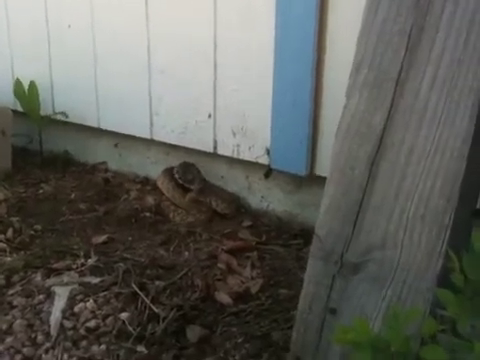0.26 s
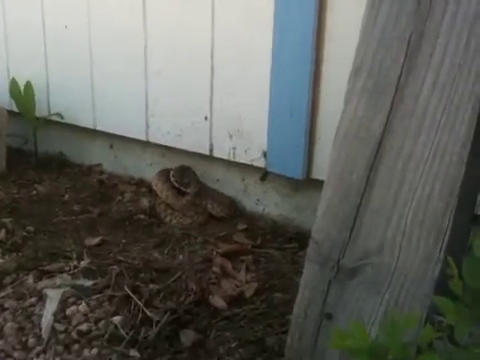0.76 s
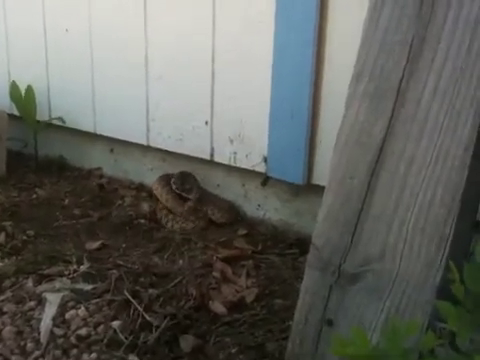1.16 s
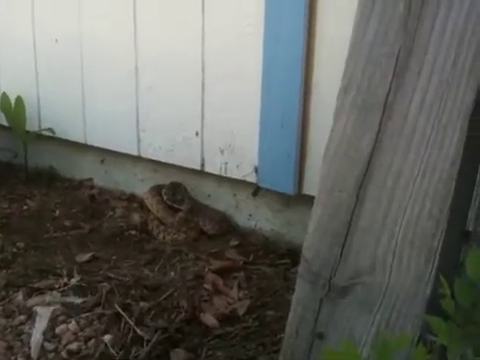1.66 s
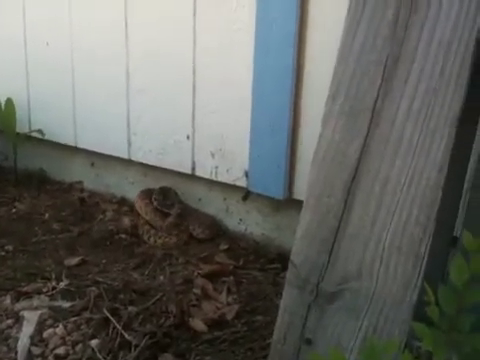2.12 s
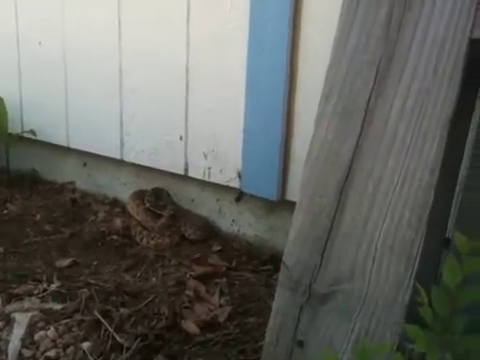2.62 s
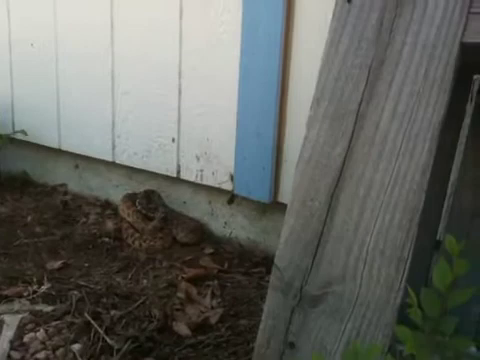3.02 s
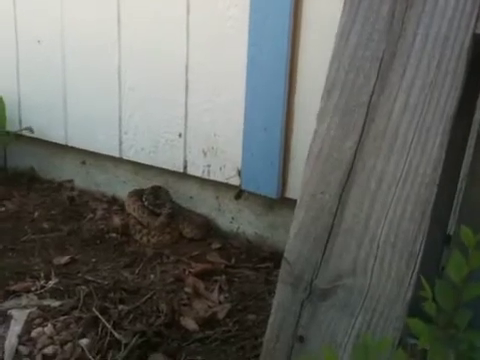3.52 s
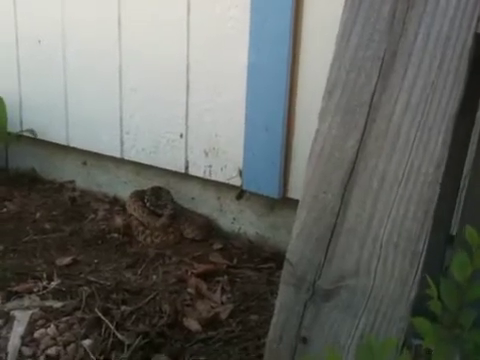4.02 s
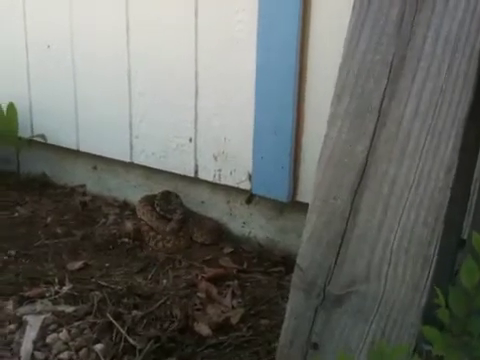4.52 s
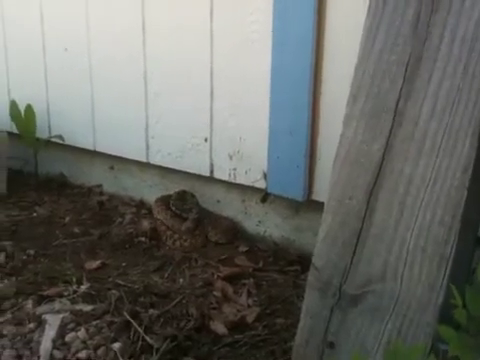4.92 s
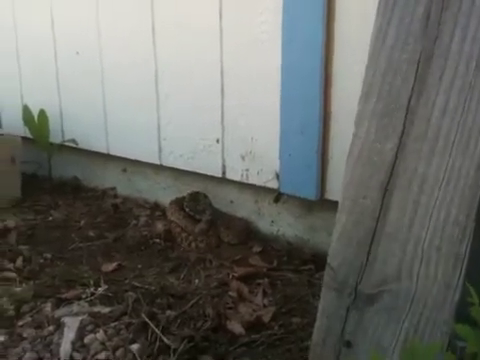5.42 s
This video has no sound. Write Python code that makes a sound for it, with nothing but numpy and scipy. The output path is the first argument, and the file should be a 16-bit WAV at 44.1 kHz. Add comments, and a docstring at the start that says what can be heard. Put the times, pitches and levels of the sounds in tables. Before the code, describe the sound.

Outdoors beside a board wall, a coiled snake finishes a thin, faint in-breath, pauses, then blows one long, airy hiss with a rough, fast flutter that grows to the end. A distant engine hums low and gradually rises in pitch. Mulch crunches softly, crisp ticks snap at about three seconds, and a thick cluster of crunches and hollow knocks comes just after four. Close dry echoes, centred sound, thin bass.

```python
"""A large snake coiled by a garage wall ends a thin in-breath: noise through sharp mouth resonances.
From the start a far eight-cylinder engine, a stack of tones with a rumble, gains speed over traffic, air and whine.
Mulch crunches as grainy noise bursts; after the breath pauses, dull knocks ring hollow and crisp ticks snap.
Then a long hiss swells: a windpipe flap makes the jet flutter, and the mouth slowly widens.
The thickest cluster of crunches and knocks comes past four seconds, under the hiss."""
import sys
import numpy as np
from scipy import signal
from scipy.fft import rfft, irfft, next_fast_len
from scipy.io import wavfile
from scipy.ndimage import uniform_filter1d

SR = 44100
rng = np.random.default_rng(int(sys.argv[2]) if len(sys.argv) > 2 else 0)


def log_audio(samples):
    """Write samples as a 16-bit WAV file to the path given in sys.argv[1]."""
    # one column per channel
    frames = np.atleast_2d(samples).T
    # limit to full scale, then quantise
    limited = np.clip(frames, -1, 1)
    pcm = np.round(limited * 32767).astype(np.int16)
    wavfile.write(sys.argv[1], SR, pcm)


N = 249606
T = np.arange(N) / SR
SIZE = next_fast_len(N)
HZ = np.arange(SIZE // 2 + 1) * SR / SIZE + 1e-3  # kept above zero for the logarithms

# engine tones above the firing tone: (time [s], level [dB])
UPPER_TONES = [(0, -69.5), (1.4, -69), (2.7, -71), (4.2, -65), (4.8, -62.5), (5.2, -57), (5.66, -59.5)]


def undb(db):
    """Decibels to gain."""
    return 10 ** (np.asarray(db) / 20)


def unit(x):
    """Scale to rms 1."""
    return x / np.sqrt(np.mean(x ** 2))


def curve(table):
    """Join (time, value) points by straight lines at the sample rate."""
    s, values = np.transpose(table)
    return np.interp(T, s, values)


def shape(points, hz):
    """Gain of a (Hz, dB) outline, interpolated over log frequency."""
    point_hz, point_db = np.transpose(points)
    return undb(np.interp(np.log(hz), np.log(point_hz), point_db))


def noise():
    """White noise for the whole scene."""
    return rng.standard_normal(N)


def through(x, gain):
    """Filter by a gain over frequency."""
    return irfft(rfft(x, SIZE) * gain, SIZE)[:N]


def walk(rate):
    """Random values held for 1 / rate seconds, then smoothed twice into a slow wander."""
    k = int(SR / rate)
    held = np.repeat(rng.standard_normal(N // k + 1), k)
    return uniform_filter1d(uniform_filter1d(held, k), k)[:N]


def patchy(points, shared_db, own_db):
    """Noise in overlapping octave bands that swell together and flicker alone, rms 1."""
    swell, gain, out = walk(4.18), shape(points, HZ), 0
    for k in range(10):
        band_power = np.clip(1 - abs(np.log2(HZ / 30) - k), 0, 1)
        band = through(noise(), gain * np.sqrt(band_power))
        out = out + band * undb(shared_db * swell + own_db * walk(11))
    return unit(out)


def resonances(modes):
    """Gain of steep-sided resonances that add in power."""
    return np.sqrt(sum(undb(2 * db) / (1 + (2 * (HZ - hz) / width) ** 2) ** 1.624 for hz, width, db in modes))


def mouth(modes, dips):
    """Mouth resonances, with narrow dips where wall and ground echoes cancel the direct sound."""
    keep = [1 - np.clip(depth, 0, 1) / (1 + (2 * (HZ - hz) / width) ** 2) for hz, width, depth in dips]
    return resonances(modes) * np.prod(keep, axis=0)


def corner(x):
    """Boards, post and ground return a short, dying scatter of small echoes."""
    level_db, t60_s = -12, .05
    t = T[:4000]
    tail = rng.standard_normal(len(t)) * undb(-60 * t / t60_s) * (t > .002)
    tail /= np.linalg.norm(tail)
    return x + signal.fftconvolve(x, tail)[:N] * undb(level_db)


def turbulent_jet():
    """Air forced through a narrow gap makes noise, gusty and sprinkled with tiny spurts."""
    spurts_per_s, spurt_size = 1100, .22  # size: typical added share of amplitude
    gusty = noise() * undb(0.69 * walk(14) + 0.53 * walk(300))
    spurts = rng.exponential(size=N) * (rng.random(N) < spurts_per_s / SR)
    return gusty * (1 + spurt_size * np.convolve(spurts, np.hanning(50), "same"))


def in_breath(jet):
    """Drawn air, without flutter, excites sharp mouth resonances and tapers to nothing."""
    start_db, end_s, taper = -56.5, 0.69, 0.49  # taper: power of the share of time left
    # resonances of the mouth in its corner: (frequency [Hz], width [Hz], level [dB])
    drawing = [(4250, 870, -9), (4800, 190, -4), (5400, 450, -13), (6360, 150, -7), (6980, 740, -4),
               (8200, 1100, -11), (9900, 650, -8), (10500, 340, -2.5), (10880, 300, 1), (11400, 280, 2.5),
               (12000, 460, -4), (14000, 450, -13), (14900, 300, -9)]
    # echo cancellations: (frequency [Hz], width [Hz], depth [0-1])
    drawing_dips = [(8550, 150, 0.5), (14100, 200, .6)]
    left = np.maximum(1 - T / end_s, 0) ** taper
    return unit(through(jet, mouth(drawing, drawing_dips))) * undb(start_db) * left


def engine():
    """Eight firings a cycle make the main tone; unequal cylinders add other multiples of the cycle rate."""
    cylinders = 8
    # engine speed: (time [s], cycle rate [Hz])
    revs = [(0, 17.15), (.8, 17.83), (2, 19.54), (5.15, 24.24), (5.66, 24.1)]
    # firing tone: (time [s], level [dB])
    firing = [(0, -64.5), (.8, -58), (1.6, -55), (2.4, -57.5), (2.8, -62), (3.2, -58.5), (3.6, -64),
              (4, -56.5), (4.4, -56), (4.8, -58.5), (5.3, -55), (5.66, -55)]
    # tones from unequal cylinders: (multiple of the cycle rate, relative level [dB])
    uneven = [(3, -15), (5, -0.5), (6, 0), (7, 4), (9, -8), (10, -3.5), (11, -2.5), (13, -5), (16, -11),
              (17, -10.5), (18, -6.5), (19, -9)]
    # how the way from the road passes these tones: (frequency [Hz], gain [dB])
    path = [(60, -1), (92, -4.5), (112, 0), (128, -6), (148, 3), (170, -10.5), (205, -0.5), (232, 2.5),
            (248, -0.5), (265, -1.5), (285, -6.5), (350, -10), (420, -2.5), (500, -3.5)]
    cycle_hz = curve(revs)
    turn = 2 * np.pi * np.cumsum(cycle_hz * (1 + .002 * walk(6))) / SR
    below_db = -82 + 4 * T  # tones below the firing tone grow steadily
    above_db = curve(UPPER_TONES)
    out = np.sin(cylinders * turn) * undb(curve(firing) + 1.2 * walk(13))
    for k, db in uneven:
        level_db = db + (below_db if k < cylinders else above_db) + 2.6 * walk(5)
        tone = np.sin(k * turn + rng.uniform(0, 2 * np.pi))
        out += undb(level_db) * shape(path, k * cycle_hz) * tone
    return np.sqrt(2) * out  # the levels are rms


def exhaust_rumble():
    """Patchy low noise from the exhaust follows part of the upper engine tones' rise and fall."""
    start_db, follows = -66.5, 0.65  # follows: share of those tones' change in dB
    # colour of the rumble: (frequency [Hz], level per Hz [dB])
    rumble = [(25, -48), (50, -10), (80, -3.5), (120, -5), (170, 2.5), (230, 0), (300, -5), (420, -3.5),
              (600, -11), (1200, -17.5), (2500, -28), (5000, -41)]
    above_db = curve(UPPER_TONES)
    return patchy(rumble, 1.0, 2.16) * undb(start_db + follows * (above_db - above_db[0]))


def traffic():
    """Far road noise in flickering bands grows slowly."""
    start_db, db_per_s = -80.5, 2
    # colour of the road: (frequency [Hz], level per Hz [dB])
    road = [(300, -6), (650, -4.5), (1200, 1.5), (2500, -23), (5000, -24)]
    return patchy(road, 0.5, 4.0) * undb(start_db + db_per_s * T)


def open_air():
    """A soft bed of noise wavers gently in its bands."""
    level_db = -70
    # colour of the air: (frequency [Hz], level per Hz [dB])
    bed = [(300, 0.5), (470, 0.5), (650, 5.5), (830, 3.5), (906, -14.5), (1710, -4), (3760, -11),
           (3900, -7.5), (13600, -11.5), (14800, -36), (15800, -38)]
    return patchy(bed, 1.0, 0.67) * undb(level_db)


def whine():
    """A narrow band of noise reads as a faint, steady, very high whine."""
    hz, width_hz, level_db = 15100, 150, -84
    return unit(through(noise(), resonances([(hz, width_hz, 0)]))) * undb(level_db)


def crunches():
    """Mulch gives way in bursts of uneven grains that swell and die away, each in its own band."""
    grains_per_s = 2200
    # bursts: (time [s], level before swell and decay [dB], centre [Hz], width [Hz],
    #          swell [s], ring, the time to fall 30 dB [s])
    bursts = [(0.177, -63, 910, 1320, 0.02, 0.24), (.235, -70, 1100, 1600, 0.018, .22),
              (.18, -61, 6560, 900, 0.0085, 0.11), (.745, -59, 10900, 8000, .001, .005),
              (.789, -70, 13000, 4000, .001, .005), (.852, -64, 11000, 3000, .001, .005),
              (.886, -61, 4760, 3400, 0.011, 0.093), (0.89, -61, 1190, 600, 0.007, 0.034),
              (.893, -66, 2300, 900, .005, .03), (.912, -63, 1400, 1300, .006, .04),
              (.922, -66, 1590, 1400, 0.012, 0.14), (3.084, -52, 3020, 2120, 0.0025, 0.058),
              (3.095, -64, 2170, 600, 0.01, 0.31), (3.1, -70, 2900, 1200, .02, .4),
              (3.16, -68, 2030, 600, .01, .2), (3.192, -54.5, 3170, 2600, .002, 0.081),
              (3.212, -60, 1880, 1000, .003, 0.026), (3.228, -62, 2100, 800, 0.015, 0.1),
              (3.478, -56.5, 2580, 2380, 0.014, 0.095), (3.487, -61, 2980, 500, .008, 0.046),
              (3.49, -63, 1550, 900, 0.0068, 0.034), (4.043, -54, 1770, 1900, 0.0057, 0.048),
              (4.056, -54, 2270, 1200, 0.0069, 0.054), (4.073, -56.5, 1670, 1600, 0.0097, 0.053),
              (4.09, -60, 915, 1300, .012, 0.29), (4.043, -60, 600, 606, 0.013, 0.57),
              (4.139, -47, 1280, 1550, 0.016, 0.11), (4.166, -49.5, 880, 1320, 0.0044, 0.11),
              (4.145, -61, 2350, 1410, 0.023, 0.11), (4.19, -67, 900, 900, 0.018, 0.1),
              (4.235, -60, 1290, 1900, 0.0087, 0.14), (4.285, -64, 805, 1000, 0.0072, 0.15)]
    out = np.zeros(N)
    struck = rng.random(N) < grains_per_s / SR
    grains = noise() * (struck + 0.27)  # a thin hiss fills the gaps between grains
    for s, db, hz, width, swell, ring in bursts:
        i, t = int(s * SR), T[:int((swell + ring) * SR)]
        edges = np.clip([hz - width / 2, hz + width / 2], 150, 15000)
        band = signal.butter(3, edges, "bandpass", fs=SR, output="sos")
        burst = unit(signal.sosfilt(band, grains[i:i + len(t)]))
        decay = undb(db - 30 * np.maximum(t - swell, 0) / ring)
        out[i:i + len(t)] += burst * decay * np.minimum(t / swell, 1)
    return out


def knocks():
    """Each blow rings the modes of something hollow; a harder blow favours the higher modes."""
    spot_db = 2  # each blow lands on its own spot and wakes the modes unevenly
    # blows: (time [s], level [dB], hardness as tilt over the modes [dB per octave], push [s])
    blows = [(.79, -63, -14, .04), (1.17, -57, -8, .03), (2.329, -58, -7, 0.043), (4.049, -62, 2.5, 0.0055),
             (4.143, -61.5, 7, .003), (4.148, -52.5, 5.5, 0.0093), (4.168, -44, -3, 0.0014),
             (4.177, -48.5, -2, 0.0023), (4.187, -45, -4.5, 0.0022), (4.205, -50.5, -3, 0.0018),
             (4.213, -53, 0, .002), (4.225, -51, -1.5, 0.0024), (4.241, -59, 0, 0.0026),
             (4.257, -49.5, -8, 0.0037), (4.29, -55, -4, 0.0023), (4.32, -60, 0, 0.0037)]
    # modes of what is knocked: (frequency [Hz], relative level [dB], ring, the time to fall 30 dB [s])
    hollow = [(85.5, -17, 0.05), (116, -8.5, 0.055), (169.5, 1, 0.055), (250, -6, 0.028), (314, -3, 0.058),
              (387, -7.5, 0.066), (487, -3, 0.057), (570, 1.5, 0.026), (633, -2.5, 0.015),
              (746, -16, 0.048), (833, -9.5, .04), (1015, -8.5, 0.029), (1090, -11, 0.023)]
    out, spots = np.zeros(N), rng.standard_normal((len(blows), len(hollow), 2))
    pivot_hz = hollow[2][0]  # hardness leaves this mode alone
    for (s, db, hard_db, push), spot in zip(blows, spots):
        for (hz, mode_db, ring), (luck, turn) in zip(hollow, spot):
            i, t = int(s * SR), T[:int((push + ring) * SR)]
            top_db = db + mode_db + hard_db * np.log2(hz / pivot_hz) + spot_db * luck
            decay = undb(top_db - 30 * np.maximum(t - push, 0) / ring)
            mode = np.sign(turn) * np.sin(2 * np.pi * hz * t)
            out[i:i + len(t)] += mode * decay * np.minimum(t / push, 1)
    return out


def ticks():
    """A sudden snap in the mulch rings briefly; the wider its band, the faster it dies."""
    # snaps: (time [s], envelope peak [dB], centre [Hz], width [Hz])
    snaps = [(3.0858, -38, 6200, 600), (3.0864, -44, 3470, 900), (3.0892, -36, 6740, 600),
             (3.0895, -47, 2070, 600), (3.101, -38, 5000, 4000), (3.1557, -50, 1920, 500),
             (3.193, -51, 4100, 700), (3.1955, -50, 3300, 900), (3.198, -56, 2480, 900),
             (3.241, -50, 2600, 2400), (3.493, -55, 2850, 900), (3.498, -49, 3000, 700),
             (.8985, -59, 5200, 800), (0.899, -56, 1250, 400), (.9325, -55, 1600, 700)]
    out, t = np.zeros(N), T[:600]
    for s, db, hz, width_hz in snaps:
        i = int(s * SR)
        damping = np.pi * width_hz * t
        envelope = np.e * damping * np.exp(-damping)  # rises to 1, then dies
        out[i:i + len(t)] += undb(db) * np.sin(2 * np.pi * hz * t) * envelope
    return out


def flutter(jet, blowing_s):
    """The windpipe flap chops the jet, slowing and swinging deeper as the blow goes on."""
    hz = 116.5 - 3.1 * blowing_s
    depth = 0.13 + 0.024 * blowing_s
    snap = .4  # share of the second harmonic: each flap is a short puff
    phase = 2 * np.pi * np.cumsum(hz * (1 + .07 * walk(20))) / SR
    flap = np.sin(phase) + snap * np.cos(2 * phase)
    return jet * (1 + depth * undb(0.5 * walk(13.0)) * flap)


def hiss(jet):
    """The fluttering jet blows out through a mouth that widens steadily while the level swells."""
    opens_s, gape_per_s = 1.13, 0.45  # gape: 0 narrow, 1 half, 2 wide
    # blowing out: (time [s], level [dB])
    exhale = [(.9, -86), (.99, -64), (1.07, -57), (1.4, -52), (1.7, -49), (2.0, -48), (2.6, -47),
              (3.5, -44.5), (3.75, -43.5), (4.25, -42.5), (4.6, -41), (5.0, -41), (5.45, -39.5),
              (5.66, -39.5)]
    # mouth resonances at each gape: (frequency [Hz], width [Hz], level [dB])
    narrow = [(1930, 730, -14), (3540, 1300, -34), (4100, 560, -11.5), (4710, 1030, -7), (5400, 310, -9.5),
              (6550, 300, -14), (6930, 1000, -5.5), (7500, 520, -7.5), (8470, 580, -6), (9660, 360, -10),
              (11100, 1500, -7), (11730, 1900, -1), (13400, 760, -8.5), (15400, 340, -23),
              (15500, 740, -11)]
    half = [(1877, 157, -12.5), (3150, 170, -46.5), (4195, 560, -7.5), (4770, 560, -7), (5570, 680, -9),
            (6230, 800, -6.5), (6980, 640, -5), (7690, 1700, -3.5), (8340, 440, -4), (9320, 230, 0),
            (10870, 610, -2.5), (11600, 2460, 0), (12700, 490, -2), (13840, 530, -0.5), (14860, 1030, 1.5)]
    wide = [(1750, 840, -23), (2900, 790, -99.5), (4140, 420, -14.5), (4790, 690, -10), (5770, 630, -9.5),
            (6670, 380, -8.5), (7570, 830, -3), (8070, 650, -2.5), (8760, 340, -4), (9650, 480, -4),
            (11170, 1200, -5.5), (12030, 860, 1), (12700, 220, 3.5), (14000, 650, -4), (14800, 1400, -4.5)]
    # echo cancellations: (frequency [Hz], width [Hz], depth [0-1])
    narrow_dips = [(2550, 300, .8), (3650, 200, .6), (4480, 130, .7), (5180, 150, .85), (6020, 200, .7),
                   (7250, 150, .55), (9270, 260, .97), (9850, 280, .65)]
    wide_dips = [(5200, 200, .65), (6000, 250, .8), (7220, 100, .6), (8740, 150, .8), (10200, 420, .85),
                 (14300, 400, .7)]
    blowing_s = np.maximum(T - exhale[0][0], 0)
    gape = np.clip(gape_per_s * (T - opens_s), 0, 2)
    flapping = flutter(jet, blowing_s)
    blown = np.zeros(N)
    # each gape blends the two nearest mouth shapes
    for k, (modes, dips) in enumerate([(narrow, narrow_dips), (half, narrow_dips), (wide, wide_dips)]):
        share = np.clip(1 - abs(gape - k), 0, 1)
        blown += share * unit(through(flapping, mouth(modes, dips)))
    # the broad lower mouth bands waver on their own
    low = signal.sosfilt(signal.butter(2, 3600, fs=SR, output="sos"), blown)
    blown += low * (undb(3.9 * walk(14)) - 1)
    return blown * undb(curve(exhale)) * (blowing_s > 0)


def scene():
    """Both breaths echo in the corner; every layer goes equally to both channels."""
    jet = turbulent_jet()
    snake = corner(in_breath(jet) + hiss(jet))
    distance = engine() + exhaust_rumble() + traffic() + open_air() + whine()
    nearby = crunches() + knocks() + ticks()
    return np.tile(snake + distance + nearby, (2, 1))


def record(dry):
    """The microphone thins the deep bass and cuts the top steeply."""
    bass_cut_hz, top_hz = 60, 15750
    thin = signal.sosfilt(signal.butter(2, bass_cut_hz, "highpass", fs=SR, output="sos"), dry)
    return signal.sosfilt(signal.ellip(16, .3, 80, top_hz, fs=SR, output="sos"), thin)


dry = scene()
out = record(dry)
log_audio(out)
```